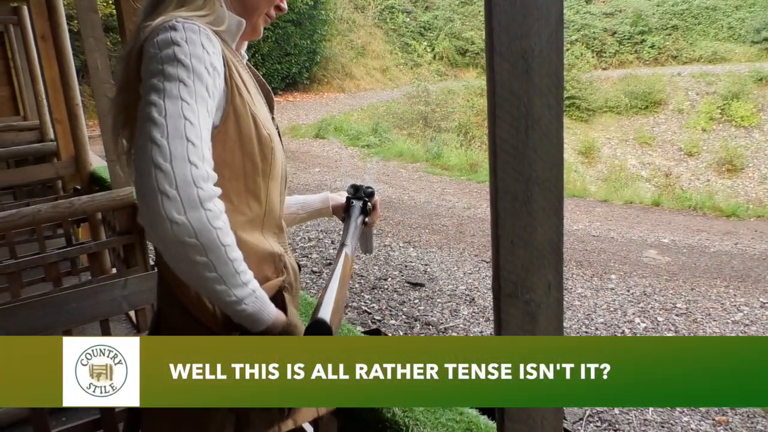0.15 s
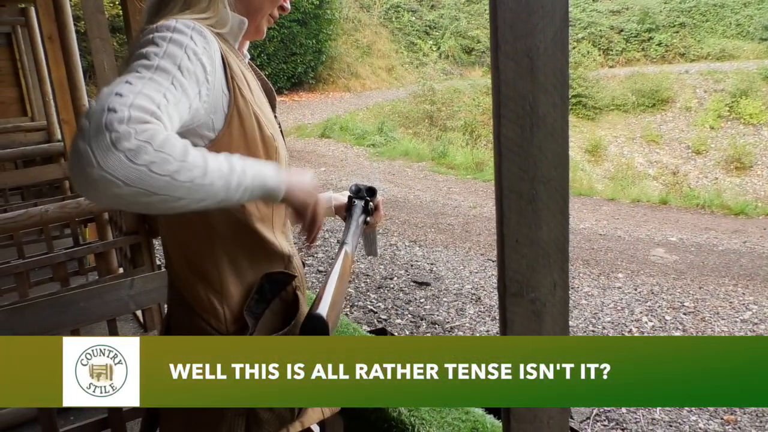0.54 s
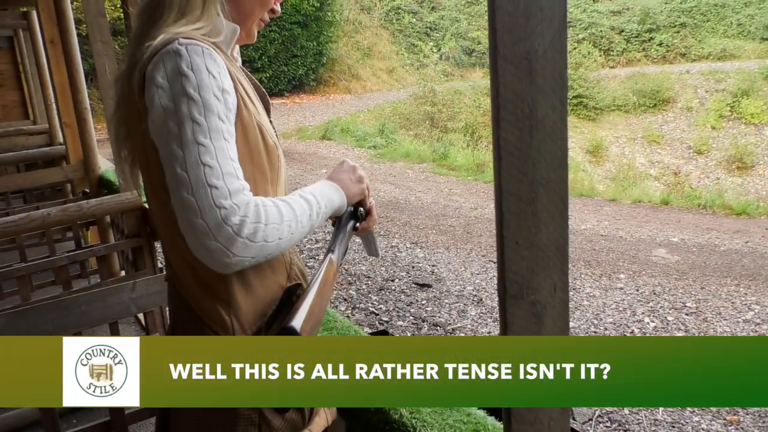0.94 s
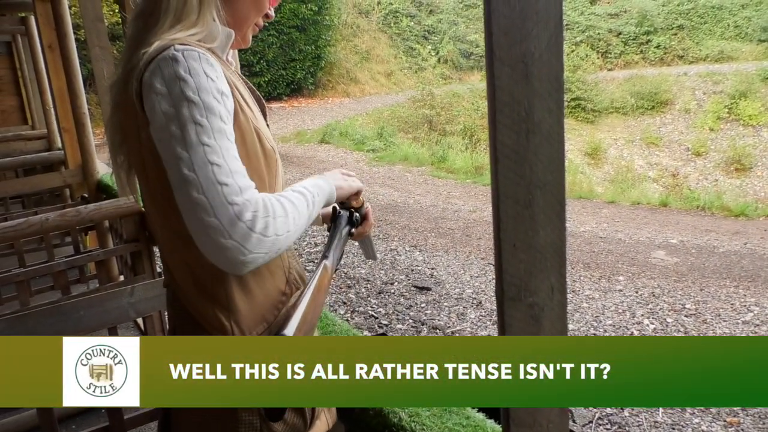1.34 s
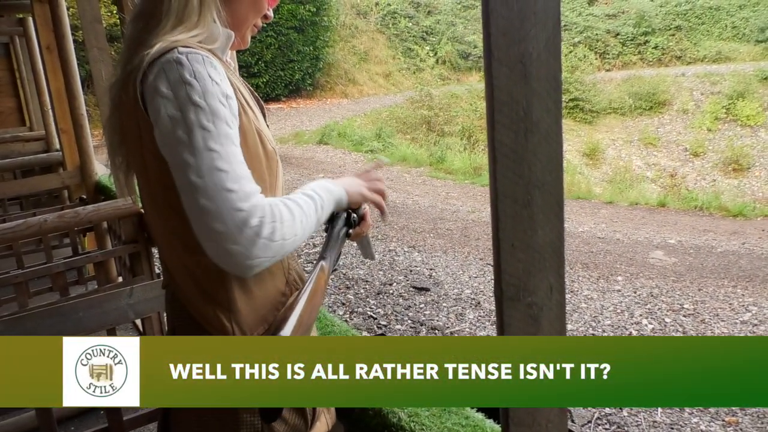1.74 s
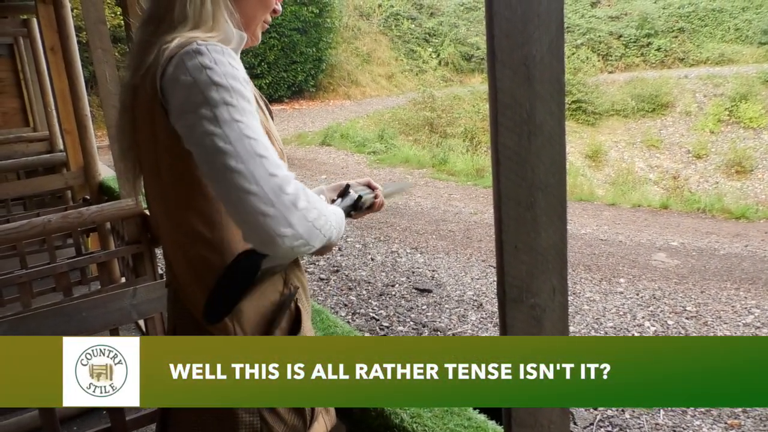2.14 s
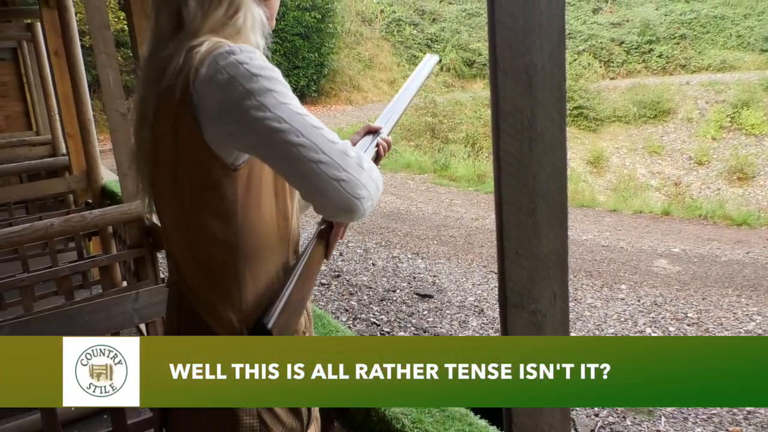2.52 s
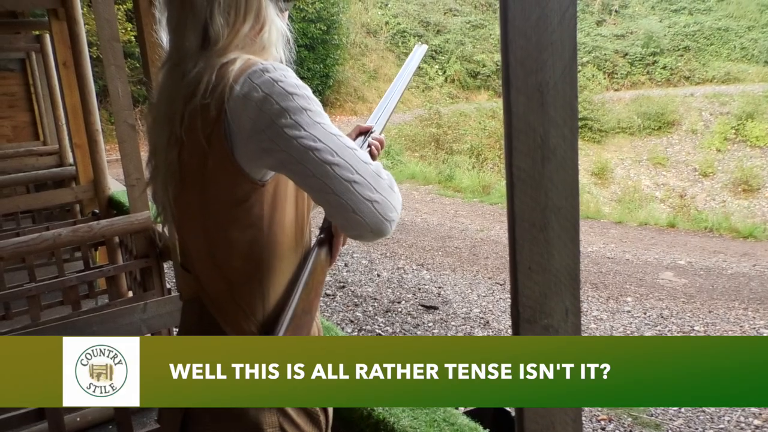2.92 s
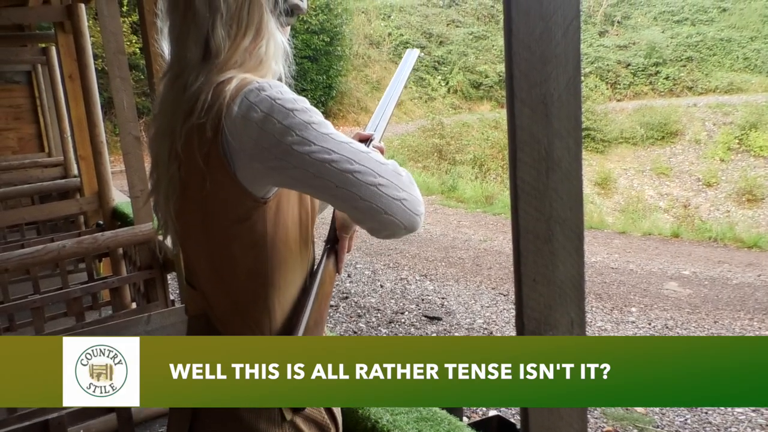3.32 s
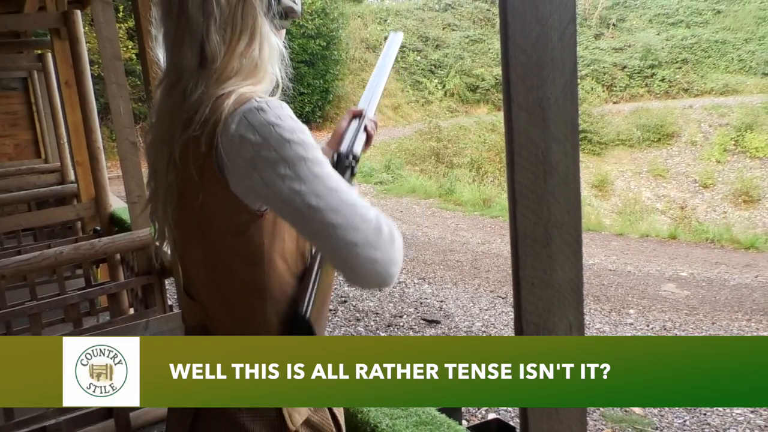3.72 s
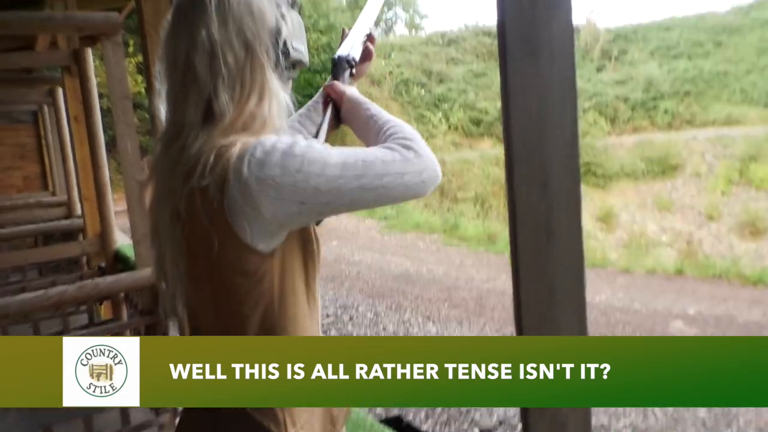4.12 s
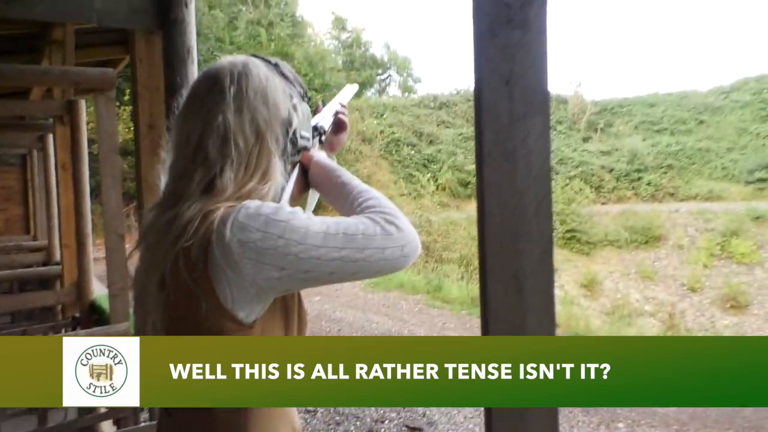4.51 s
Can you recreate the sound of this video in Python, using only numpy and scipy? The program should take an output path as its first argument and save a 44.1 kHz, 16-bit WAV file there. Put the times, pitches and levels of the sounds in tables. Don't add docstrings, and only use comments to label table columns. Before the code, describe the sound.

Close gun handling under a timber shelter: two shells drop in, a hard metallic snap closes the action, two sharp cocking clicks follow.

```python
import sys
import numpy as np
from scipy import signal
from scipy.fft import rfft, irfft, next_fast_len
from scipy.io import wavfile
from scipy.ndimage import uniform_filter1d, map_coordinates

SR = 44100
rng = np.random.default_rng(int(sys.argv[2]) if len(sys.argv) > 2 else 0)


def magnitude_from_level(level_db):
    exponent = np.asarray(level_db, float) / 20
    return 10 ** exponent


def log_audio(samples):
    frames = np.atleast_2d(samples).T
    limited = np.clip(frames, -1, 1)
    pcm = np.round(limited * 32767).astype(np.int16)
    wavfile.write(sys.argv[1], SR, pcm)


N = 205581

# frequency in Hz, level in dB, t60 in seconds.
LOOSE = [(1190, 3, .045), (2092, 2, .03), (3000, -5, .04), (3894, -4, .05), (5130, -3, .04),
         (6300, -6, 0.036)]


def unit(x):
    return x / np.sqrt(np.mean(x ** 2) + 1e-20)


def along(points, hz):
    f, v = np.transpose(points)
    return np.interp(np.log(hz + 1), np.log(f + 1), v)


def wobble(rate):
    knots = rng.standard_normal(int(N * rate / SR) + 4)
    return map_coordinates(knots, [np.arange(N) * rate / SR])


def noise(spectrum):
    m = next_fast_len(N)
    colour = magnitude_from_level(along(spectrum, np.fft.rfftfreq(m, 1 / SR)))
    return unit(irfft(rfft(rng.standard_normal(m)) * colour, m)[:N])


def swell(peak_s, rise, fall):
    t = np.arange(N) / SR - peak_s
    return np.exp(-(t / np.where(t < 0, rise, fall)) ** 2)


def add(out, s, x):
    out[round(s * SR):][:len(x)] += x


def causal(gain):
    c = irfft(np.log(gain + 1e-6))
    c[1:len(c) // 2] *= 2
    c[len(c) // 2 + 1:] = 0
    return np.exp(rfft(c))


def resonance(f, hz, t60):
    width = np.log(1000) / (np.pi * max(t60, 1e-4))
    return 1000j * f / (hz * hz - f * f + 1j * f * width)


def shelter(size):
    # frequency in Hz, t60 in seconds.
    dying = [(300, 0.51), (700, 0.28), (1500, 0.16), (5000, 0.22), (9000, 0.17), (14000, 0.2)]
    hz, t, z = signal.stft(rng.standard_normal(size // 2), SR, nperseg=256)
    decay = magnitude_from_level(-60 * t / along(dying, hz)[:, None])
    tail = signal.istft(z * decay, SR, nperseg=256)[1][:size // 2]
    tail = tail * np.clip(np.arange(len(tail)) / SR / 0.0055 - .4, 0, 1)
    return rfft(tail / np.linalg.norm(tail), size)


def contacts(table, modes, ring_db, top_db, wet_db, spike, rise, soft_s):
    # frequency in Hz, level in dB.
    timber = [(2000, 1.5), (6000, 0), (9000, -5.5), (11000, -10), (16000, -9)]
    soft_db, hardens = -43.5, .25
    modes_db = -21
    size = 16384
    out, t, f = np.zeros(N + size), np.arange(size) / SR, np.fft.rfftfreq(size, 1 / SR)
    for s, db, hz, low_db, high_db in table:
        t60 = soft_s * magnitude_from_level(-hardens * (db - soft_db))
        push = magnitude_from_level(-60 * t / max(t60, .002)) + spike * magnitude_from_level(-60 * t / 0.0035)
        push = push * (1 - np.exp(-t / rise))
        force = rfft(rng.standard_normal(size) * push)
        force = force * causal(1 / np.sqrt(uniform_filter1d(np.abs(force) ** 2, size=200)))
        treble_db = high_db + top_db
        tone = [(150, low_db - 45.5), (260, low_db - 23.5), (380, low_db - 5.0), (1100, low_db),
                (1550, low_db - 2.5), (1900, -0.5), (3500, -2.5), (4600, -6.0),
                (6500, high_db - 4.0), (9700, high_db - 6.0), (10400, treble_db),
                (13200, treble_db - 6.5), (14200, treble_db - 12.0), (16500, treble_db - 16.5)]
        luck_db = rng.normal(0, 2, len(modes))
        body = 0
        for k, (mode_hz, level, life) in enumerate(modes):
            body = body + (-1) ** k * magnitude_from_level(level + luck_db[k]) * resonance(f, mode_hz, life)
        spot = resonance(f, hz, .009)
        colour = causal(magnitude_from_level(along(tone, f)))
        crack = force * colour
        ring = magnitude_from_level(modes_db) * body * colour + magnitude_from_level(ring_db) * spot * crack
        hit = crack + ring
        echo = (crack + 0.2 * ring) * magnitude_from_level(wet_db + along(timber, f)) * shelter(size)
        peak = np.abs(irfft(hit * (f > 1500) * (f < 5000))).max()
        add(out, s, magnitude_from_level(db) / peak * irfft(hit + echo))
    return out[:N]


def puffs(table, width):
    size = 4096
    out, f = np.zeros(N + size), np.fft.rfftfreq(size, 1 / SR)
    t = (np.arange(size) - size // 2) / SR
    for s, db, hz, length in table:
        band = irfft(rfft(rng.standard_normal(size)) * np.exp(-((f - hz) / (width * hz)) ** 2))
        band = band * np.exp(-(2 * t / length) ** 2)
        add(out, s - size // 2 / SR, magnitude_from_level(db) * band / np.abs(band).max())
    return out[:N]


def open_air():
    # frequency in Hz, level in dB per Hz.
    air_colour = [(12, -31), (20, -4.5), (71, -7), (151, -8), (212, -26), (314, -1.5), (416, -1.5),
                  (616, -3), (690, -3), (939, 2.5), (2440, -18), (4160, -25), (4530, -20.5), (14700, -29.5),
                  (16500, -44.5)]
    return magnitude_from_level(-65 + 1.0 * wobble(8.1) + 0.7 * wobble(32)) * noise(air_colour)


def cloth():
    # frequency in Hz, level in dB per Hz.
    pocket_colour = [(59, -50), (100, -18.5), (177, -15.5), (225, -32), (300, -4.5), (506, 2.5), (973, -4),
                     (1620, -11), (2170, -15), (2870, -19), (5000, -27), (9000, -89.5)]
    swish_colour = [(880, -42), (1500, -8.5), (1890, -1.5), (3780, -2), (5260, -9), (9220, -17.5),
                    (14900, -24), (16500, -34.5)]
    wool_colour = [(2500, -37), (5000, -3.5), (8000, 0), (12000, -7.5), (15000, -20), (16500, -23)]
    # peak time, rise and fall in seconds, peak in dB.
    rummage = [(.12, 0.081, 0.074, -61.5), (.63, 0.017, .02, -59), (.665, 0.019, 0.044, -51),
               (.75, 0.033, 0.022, -51), (.785, 0.027, 0.017, -58), (.82, 0.024, 0.032, -50.5),
               (.4, 0.034, 0.069, -67.5), (1.05, 0.11, 0.072, -59), (2.25, 0.14, 0.14, -61),
               (3.17, 0.12, 0.2, -66), (3.8, 0.045, 0.11, -61.5), (4.101, 0.23, 0.23, -67.5),
               (3.6, 0.13, 0.11, -68.5), (4.68, 0.088, 0.089, -53.5)]
    # peak time, rise and fall in seconds, peak in dB.
    swings = [(.04, 0.036, 0.14, -65), (.45, 0.12, 0.094, -65), (.72, 0.1, 0.24, -64),
              (1.14, 0.14, 0.05, -58), (2.29, 0.26, 0.19, -57), (2.6, 0.16, 0.4, -78),
              (3.38, 0.087, 0.27, -66.5), (3.75, 0.19, 0.16, -65), (4.12, 0.21, 0.18, -62)]
    # peak time, rise and fall in seconds, peak in dB.
    brushes = [
        (3.37, 0.038, 0.099, -68.5),
        (4.05, 0.16, 0.13, -71.5),
    ]
    still_db = -78
    clumps = 3.5 * wobble(150) + 1.2 * wobble(40)
    pocket = unit(noise(pocket_colour) * magnitude_from_level(clumps))
    swish = unit(noise(swish_colour) * magnitude_from_level(2.6 * wobble(60) + 2.0 * wobble(25)))
    wool = unit(noise(wool_colour) * magnitude_from_level(2.4 * wobble(80)))
    hand = sum(magnitude_from_level(db) * swell(s, rise, fall) for s, rise, fall, db in rummage)
    brush = sum(magnitude_from_level(db) * swell(s, rise, fall) for s, rise, fall, db in brushes)
    arms = magnitude_from_level(still_db) + sum(magnitude_from_level(db - 5.5) * swell(s, rise, fall) for s, rise, fall, db in swings)
    return hand * pocket + arms * swish + brush * wool


def loose_shells():
    # start in seconds, peak in dB, ring in Hz, low and high tone in dB.
    rattle = [(0.0322, -47, 4170, -21, -14), (0.0685, -41, 2760, -19, -15), (0.077, -42, 2900, -11, -18),
              (0.1016, -43.5, 1000, -2.5, -14), (0.1112, -43.5, 1390, -2.5, -17),
              (0.1764, -52, 985, -26, 0.5), (0.2133, -49.5, 3840, -33, -24), (0.2344, -58.5, 1130, -2, 0),
              (0.356, -56, 1970, -11, -26), (0.4538, -41.5, 3880, -13, -4.5), (0.5716, -45, 2450, 1.5, -14),
              (0.7264, -41.5, 3730, 9, -6), (0.7439, -48.5, 1190, 5, -12), (0.8075, -46, 1040, 0.5, -8),
              (0.816, -50, 1110, 4, -28), (0.8565, -53, 3700, -30, -0.5), (0.8954, -52.5, 3800, -25, -2)]
    return contacts(rattle, LOOSE, ring_db=0, top_db=-20, wet_db=-2.5, spike=0.22, rise=0.00016, soft_s=0.021)


def creaks():
    # centre in seconds, peak in dB, pitch in Hz, length in seconds.
    slips = [(3.795, -57, 3300, .008), (3.81, -53, 2600, .012), (3.824, -58, 5900, .012),
             (3.826, -57, 3900, .012), (3.868, -51, 6200, .009), (3.869, -48, 3400, .012),
             (3.87, -50, 750, .012), (3.893, -55, 3000, .008), (3.893, -59, 5800, .008),
             (4.14, -54, 3700, .016), (4.135, -62, 6000, .012), (4.158, -62, 6300, .006),
             (4.16, -58, 3900, .01), (4.245, -59, 5800, .01), (4.29, -63, 7400, .02),
             (4.283, -54, 850, .012), (3.435, -57, 3800, .012), (3.472, -55, 3700, .01),
             (.612, -62, 2890, .006), (.727, -45, 3750, .005), (.858, -52, 3700, .008),
             (.656, -56, 2040, .006), (2.052, -55, 3300, .015), (.58, -53, 2900, .016),
             (.573, -52, 5100, .005), (.74, -53, 4000, .025), (1.531, -55, 3100, .005),
             (1.535, -53, 3600, .006), (1.86, -56, 3800, .005), (1.975, -54, 6200, .02),
             (2.044, -51, 1500, .006), (1.549, -42, 1170, .012), (1.567, -53, 1150, .014),
             (1.541, -49, 1200, .008), (1.626, -48, 1200, .014), (1.968, -50, 5800, .006),
             (2.005, -58, 3500, .01), (3.868, -55, 4400, .01)]
    return puffs(slips, width=0.11)


def ticks():
    # centre in seconds, peak in dB, pitch in Hz, length in seconds.
    snaps = [(.872, -62, 7500, .003), (1.1245, -47, 9600, 0.0033), (1.967, -44, 9500, .003),
             (1.9712, -39.5, 10400, .003), (2.030, -55, 8500, .003), (2.0405, -40.5, 9100, 0.002),
             (2.069, -56, 4500, .002), (2.3385, -57, 12000, 0.0034), (2.853, -68, 7500, .003),
             (2.888, -62, 7500, 0.0032), (3.096, -55, 10410, .003), (3.148, -58, 7500, 0.0042),
             (3.212, -65, 12000, .003), (3.217, -67, 12500, .003), (3.316, -62, 8500, 0.0034),
             (4.025, -53.5, 9020, 0.0025), (4.349, -61.5, 9510, 0.0031), (1.733, -66, 11000, .004),
             (1.743, -63, 11000, .004)]
    return puffs(snaps, width=0.27)


def first_shell():
    # start in seconds, peak in dB, ring in Hz, low and high tone in dB.
    knocks = [
        (0.9389, -35, 1270, -8, -12.5),
        (0.9504, -25, 3250, -4, -6),
    ]
    # frequency in Hz, level in dB, t60 in seconds.
    case = [(1190, 0, .04), (2070, 6, 0.033), (3270, 1, .03), (4670, 6, 0.04), (5190, 4, 0.062),
            (6300, 6.5, 0.11), (7060, 8, 0.091), (7900, -5, .07), (8760, 2, 0.055), (10400, -10, .04),
            (11100, 5, 0.079), (11900, 15, .03)]
    return contacts(knocks, case, ring_db=2.5, top_db=2.5, wet_db=-12.0, spike=0.66, rise=0.00027, soft_s=0.029)


def second_shell():
    # start in seconds, peak in dB, ring in Hz, low and high tone in dB.
    knocks = [
        (1.0155, -42.5, 2450, -2, -9),
        (1.024, -43, 2590, -7, -21),
        (1.0454, -24.5, 2360, -4, -6),
        (1.1202, -43, 1940, -3, -6),
        (1.1243, -40, 3820, -20, 2),
        (1.1304, -40.5, 3750, -4, -8),
        (1.1405, -34.5, 2400, 1, -6),
        (1.1606, -46.5, 3360, -23, -9),
    ]
    # start in seconds, peak in dB, ring in Hz.
    rocks = [
        (1.059, -32, 2250),
        (1.0732, -35, 2100),
        (1.0932, -42.5, 1980),
        (1.1085, -43, 1970),
    ]
    # frequency in Hz, level in dB, t60 in seconds.
    case = [(1210, 8.5, 0.058), (2030, -2, 0.038), (2360, -4, .03), (2900, 16.5, 0.013), (3240, 7, .03),
            (4650, -1, .03), (7100, 2, 0.064), (9000, -6, 0.034), (9690, 0, .03), (10200, 4, 0.054),
            (12000, 1, .03)]
    rock_low_db, rock_high_db = 3, -21
    rocking = [(*rock, rock_low_db, rock_high_db) for rock in rocks]
    return contacts(knocks + rocking, case, ring_db=0.5, top_db=-5.0, wet_db=-12.5, spike=0.35,
                    rise=0.00071, soft_s=0.021)


def seating():
    # start in seconds, peak in dB, ring in Hz, low and high tone in dB.
    presses = [(1.4142, -47, 3500, -39, -13), (1.4738, -50.5, 2040, -9, -9), (1.4943, -47.5, 2010, 7, -7),
               (1.5075, -44.5, 2050, 14, -1), (1.538, -48, 1170, -3, -12), (1.544, -52, 1800, -4, -7),
               (1.547, -50, 1120, 13.5, 1), (1.5877, -54, 2030, -22, 0), (1.611, -44, 2900, -7, -12),
               (1.6187, -45, 1210, 2, -11), (1.627, -46.5, 2540, 1, -12), (1.7295, -45, 1970, 10.5, -28)]
    return contacts(presses, LOOSE, ring_db=2.0, top_db=-1.5, wet_db=-7.5, spike=1.4, rise=0.0002, soft_s=0.031)


def bird():
    t = np.arange(N) / SR
    arch = np.clip((t - 1.7) / .14, -2, 2) ** 2
    hz = 3545 + 25 * wobble(60) - 40 * arch
    beat = 1 + 0.72 * np.cos(2 * np.pi * 52 * t + 1.5 * wobble(22.1))
    loudness = magnitude_from_level(-65) * swell(1.627, rise=0.07, fall=0.13)
    return loudness * beat * np.sin(2 * np.pi * np.cumsum(hz) / SR)


def grasp():
    # start in seconds, peak in dB, ring in Hz, low and high tone in dB.
    touches = [(1.8665, -50.5, 3400, -28, -2), (1.8909, -53, 1250, -17, -26), (1.9047, -48, 3560, 2, -8),
               (1.9206, -34.5, 2070, -0.5, -15), (1.9353, -39.5, 2040, -8, -17),
               (1.944, -45, 2200, -8, -16), (1.9485, -44, 2450, -13, -12), (1.960, -56, 2680, -2, -16),
               (1.9656, -34.5, 2030, -0.5, -12.5), (1.9704, -38.5, 1970, -15, -7.5),
               (2.04, -43.5, 3820, -18, -0.5)]
    return contacts(touches, LOOSE, ring_db=1.0, top_db=-7, wet_db=-8.5, spike=.8, rise=0.00025, soft_s=0.035)


def slide():
    # start in seconds, peak in dB, ring in Hz, low and high tone in dB.
    clicks = [(2.1382, -21, 2100, -7.5, -1), (2.1455, -25, 2158, -0.5, -4.5),
              (2.163, -27.5, 2175, -7.5, -12), (2.1672, -20.5, 2133, -0.5, -8.5),
              (2.171, -25.5, 3027, 10, -8), (2.1864, -31, 2150, -12, -0.5), (2.196, -38, 2115, 1, -11.5),
              (2.2075, -34.5, 2118, -5.5, -7)]
    # frequency in Hz, level in dB, t60 in seconds.
    lever = [(495, -5.5, 0.028), (1150, -4, .05), (2150, 3, 0.054), (4250, 3, .03), (5350, 5.5, 0.027),
             (6790, 8.5, 0.05), (11070, 11, .07)]
    return contacts(clicks, lever, ring_db=-10.0, top_db=-12.5, wet_db=-12.5, spike=.15,
                    rise=0.00013, soft_s=0.043)


def thump():
    # start in seconds, peak in dB, pitch in Hz, t60 in seconds.
    jolts = [
        (2.219, -56, 55, .13),
        (2.22, -60, 120, .2),
        (2.145, -62, 140, .1),
        (2.172, -31, 470, .13),
    ]
    out, t = np.zeros(N), np.arange(SR // 4) / SR
    for s, db, hz, t60 in jolts:
        add(out, s, magnitude_from_level(db - 60 * t / t60) * np.sin(2 * np.pi * hz * t))
    return out


def bolt():
    # start in seconds, peak in dB, pitch in Hz, rise and fall in seconds.
    squeal = [(2.1665, -12.5, 2110, 0.0039, 0.0014), (2.1709, -11.5, 2128, 0.0022, 0.0033),
              (2.175, -20, 2360, .002, 0.0022), (2.1678, -18.5, 3000, 0.0018, 0.0027),
              (2.2141, -8, 2900, 0.0013, .0008), (2.2178, -6.5, 2180, 0.0011, .0013),
              (2.2228, -6, 4105, .0007, 0.00098)]
    out, t = np.zeros(N), np.arange(2000) / SR
    for s, db, hz, rise, fall in squeal:
        growing = np.sin(np.pi / 2 * t / rise) ** 2
        fading = np.exp(-((t - rise) / fall) ** 2)
        add(out, s, magnitude_from_level(db) * np.where(t < rise, growing, fading) * np.sin(2 * np.pi * hz * t))
    return out


def snap_shut():
    # start in seconds, peak in dB, ring in Hz, low and high tone in dB.
    slam = [
        (2.2146, -11.5, 2920, 0, -1),
        (2.2156, -8.5, 2790, 2, -5.5),
        (2.2182, -20, 2400, -8.5, -6.5),
        (2.2203, -16.5, 2500, -7, -8),
    ]
    closing = [
        (2.2227, -5.5, 4130, -7.5, 4),
        (2.2240, -9.5, 3106, -0.5, 0.5),
        (2.2308, -26, 3940, -5.5, -9),
        (2.236, -24.5, 2840, 0.5, -13.5),
        (2.257, -36, 4010, -1.5, -3),
        (2.4246, -36.5, 3570, -39, -8.5),
    ]
    # frequency in Hz, level in dB, t60 in seconds.
    frame = [(413, -9.5, 0.065), (623.7, 2, .04), (880, -1.5, .035), (1085, 7, 0.022), (1520, 8.5, .015),
             (1850, 0, 0.022), (2400, 0, .02), (2965, 1, 0.034), (4130, -4.5, .01), (5514, -5.5, 0.023),
             (7030, 6, 0.02), (11660, 13.5, 0.0099)]
    home = contacts(slam, frame, ring_db=-1.5, top_db=-17.5, wet_db=-13.5, spike=0.44,
                    rise=0.00046, soft_s=0.026)
    locked = contacts(closing, frame, ring_db=-1, top_db=-5.0, wet_db=-14.0, spike=0.89,
                      rise=0.00026, soft_s=0.014)
    return home + locked


def thumb():
    # start in seconds, peak in dB, ring in Hz, low and
    # high tone in dB.
    thumb_moves = [
        (3.013, -47, 3750, -22, -16),
        (3.152, -52.5, 4160, -18.5, -2.5),
        (3.1692, -49.5, 2200, 3, -6.5),
        (3.582, -43.5, 650, 4, 0.5),
                   (3.095, -46.5, 2030, 4.5, -6),
        (3.5805, -35, 2286, -3.5, -7),
    ]
    # frequency in Hz, level in dB, t60 in seconds.
    spur = [(650, 8.5, 0.06), (1290, 3, 0.047), (2286, 11, .06), (3250, -2, 0.029), (7500, 12, 0.018),
            (8300, 2, .02)]
    return contacts(thumb_moves, spur, ring_db=-2.5, top_db=-12.5, wet_db=-13, spike=.2,
                    rise=0.00047, soft_s=0.039)


def cocking(hammer):
    # delay in seconds, loss in dB, low and high tone in dB.
    catch = [
        (0, 0, -6.5, 7),
        (.0015, 4, -4, -3),
        (.004, 8, -7.5, -1),
        (.007, 18.5, -4, 4.5),
    ]
    s, db, hz, bright_db = hammer
    return [(s + late, db - loss_db, hz, low_db, high_db + bright_db)
            for late, loss_db, low_db, high_db in catch]


def hammers():
    # start in seconds, peak in dB, ring in Hz, brightness in dB.
    cocks = [
        (3.0195, -15, 2497, 1),
        (3.5014, -11, 2480, -1),
    ]
    # frequency in Hz, level in dB, t60 in seconds.
    right_lock = [(470, 2.5, 0.037), (1000, 10, .02), (1244, 12.5, 0.037), (1900, 5.5, .035),
                  (2164, 11, 0.049), (2570, 15, .015), (3027, -17, .03), (4520, -5, .05), (6120, -11, .05),
                  (7140, 0, .04), (7850, -3, 0.045), (8700, 18.5, .01), (9500, 16, 0.024),
                  (12500, 9, 0.0056)]
    left_lock = [(440, 0.5, 0.046), (910, 6.5, .03), (1221, 6, 0.041), (1870, 2.5, 0.038), (2350, 5, 0.048),
                 (2450, 10.5, 0.016), (2920, 4.5, 0.025), (3130, 9, 0.022), (5065, 7, 0.026),
                 (6075, 2, .05), (7934, 6, .025), (9150, 15, .008), (9627, 12, 0.027), (12580, 17.5, .006)]
    right = contacts(cocking(cocks[0]), right_lock, ring_db=-2.0, top_db=-8, wet_db=-12, spike=1.7,
                     rise=0.00014, soft_s=0.0245)
    left = contacts(cocking(cocks[1]), left_lock, ring_db=-2, top_db=-6.5, wet_db=-13, spike=2.0,
                    rise=0.00012, soft_s=0.031)
    return right + left


def grip():
    # start in seconds, peak in dB, ring in Hz, low and high tone in dB.
    knocks = [(3.793, -60, 2570, -15.5, -27), (3.859, -48.5, 3375, -11, 0), (3.8898, -56, 3380, -10, 5),
              (4.2437, -58, 1610, 4, 4), (4.486, -76, 3815, -24, 11), (4.468, -55, 1880, 5, -17),
              (4.604, -49.5, 3380, -10, 0), (4.6146, -50.5, 3480, -6, 3), (4.6382, -58, 2380, -2, -2)]
    return contacts(knocks, LOOSE, ring_db=5.0, top_db=-19, wet_db=4.5, spike=0.6, rise=0.0004, soft_s=0.04)


def scene():
    loading = loose_shells() + first_shell() + second_shell() + seating()
    closing_up = grasp() + slide() + thump() + bolt() + snap_shut()
    readying = thumb() + hammers() + grip()
    small_noises = creaks() + ticks()
    gun = loading + closing_up + readying + small_noises
    return (gun + cloth() + bird() + open_air())[None]


def low_pass(x):
    return signal.sosfilt(signal.butter(12, 16810, fs=SR, output="sos"), x)


def record(dry):
    edge = signal.butter(N=12, Wn=16000, fs=SR, output="sos")
    dry = signal.sosfilt(edge, dry)
    dry = dry / (1 + np.abs(dry / .97) ** 6) ** (1 / 6)
    return low_pass(dry)


dry = scene()
out = record(dry)
log_audio(out)
```